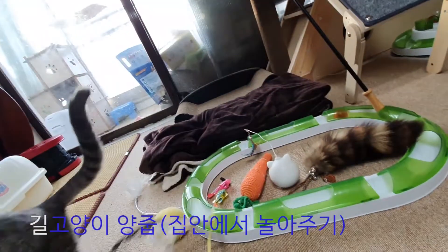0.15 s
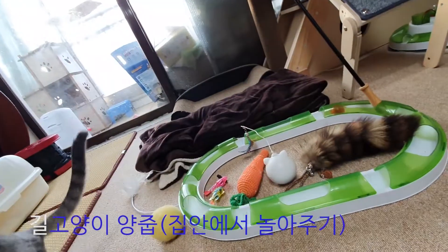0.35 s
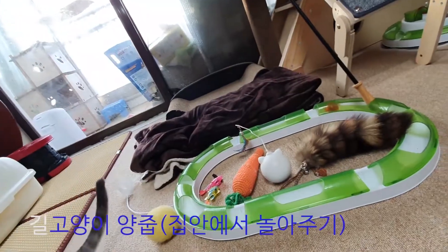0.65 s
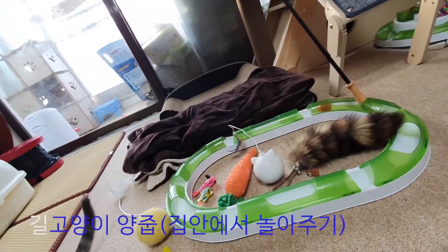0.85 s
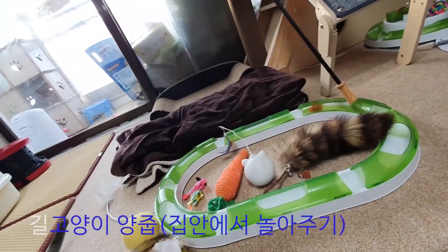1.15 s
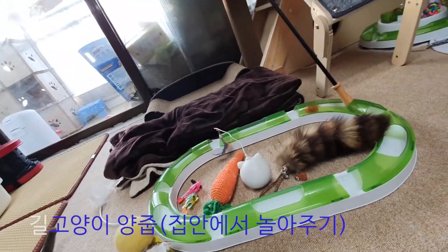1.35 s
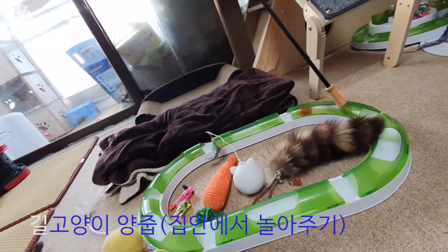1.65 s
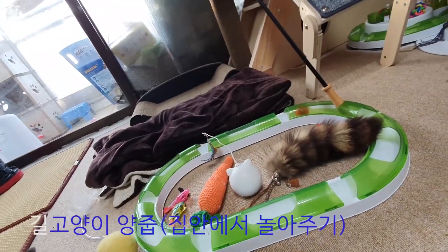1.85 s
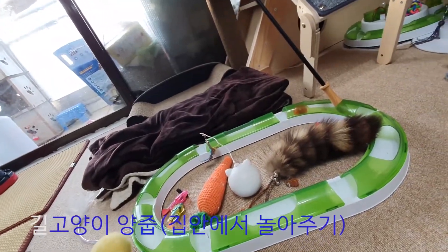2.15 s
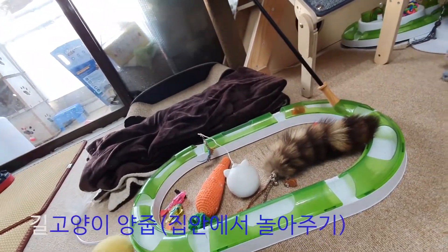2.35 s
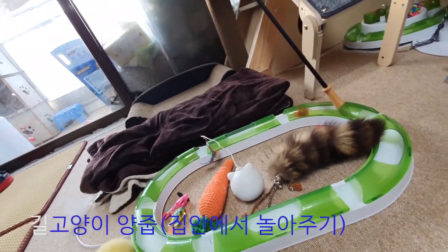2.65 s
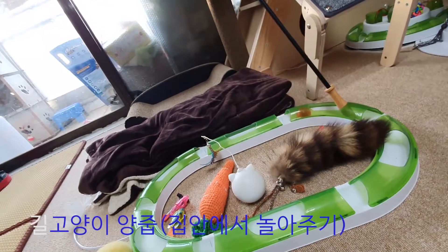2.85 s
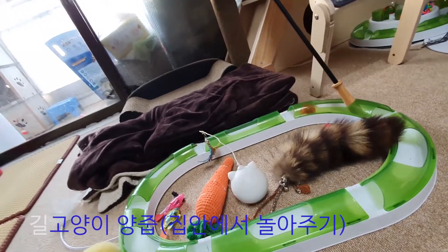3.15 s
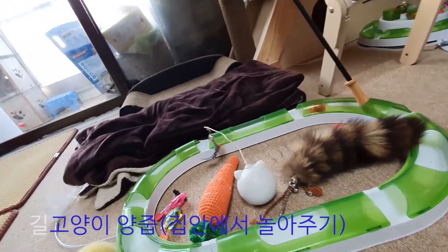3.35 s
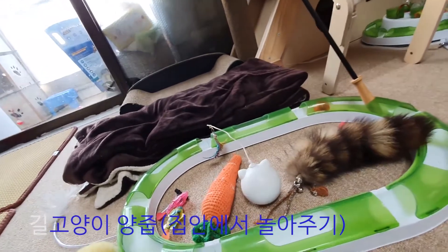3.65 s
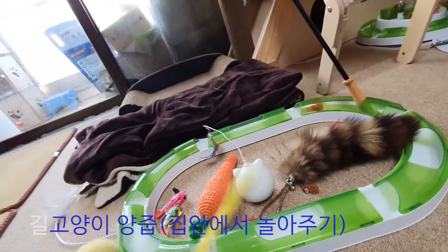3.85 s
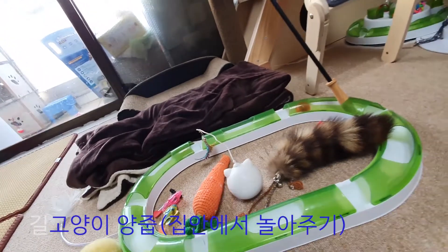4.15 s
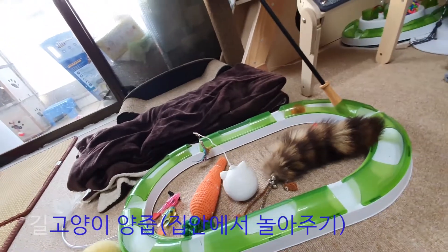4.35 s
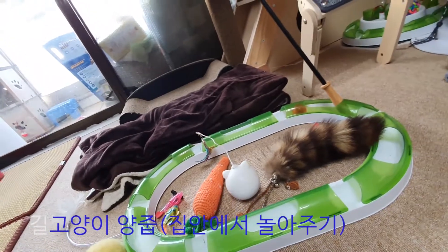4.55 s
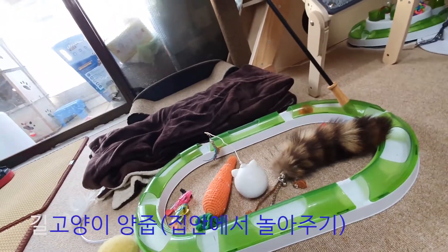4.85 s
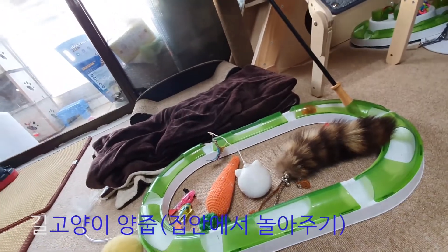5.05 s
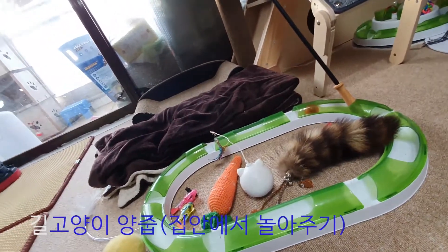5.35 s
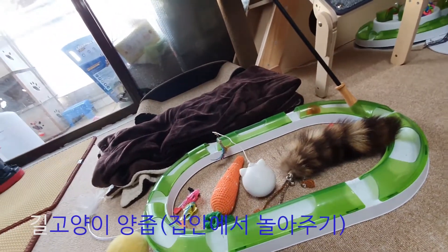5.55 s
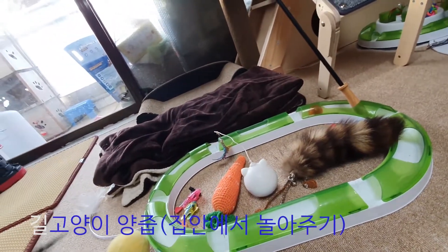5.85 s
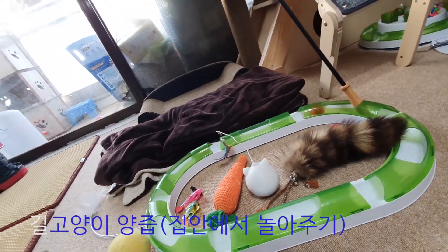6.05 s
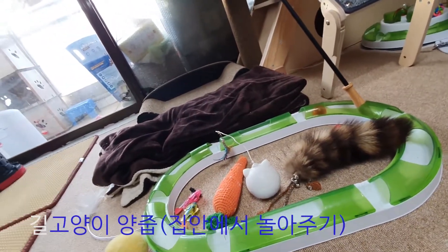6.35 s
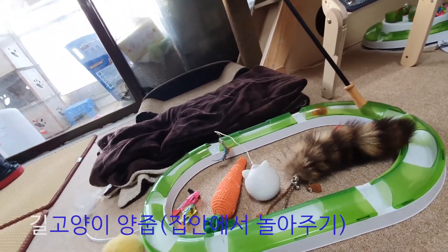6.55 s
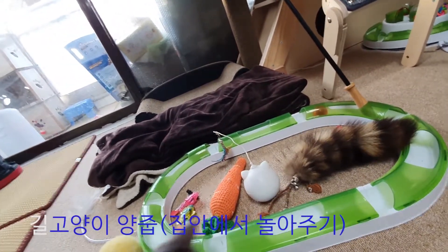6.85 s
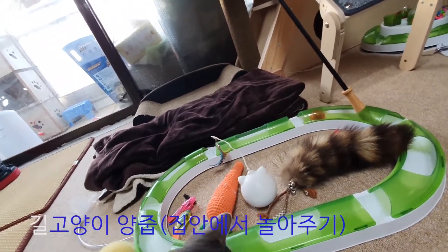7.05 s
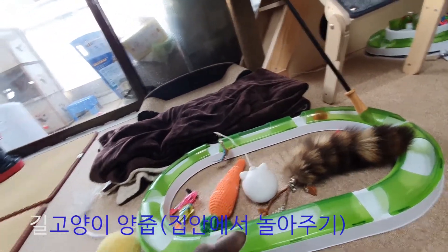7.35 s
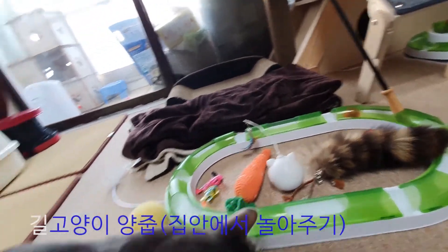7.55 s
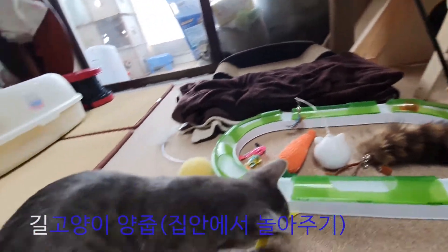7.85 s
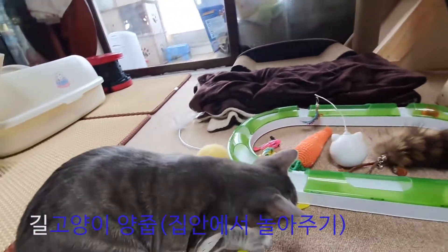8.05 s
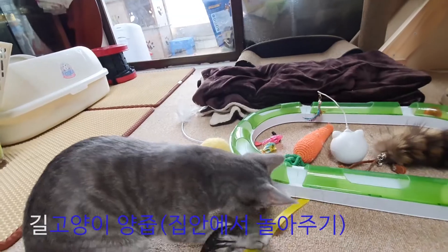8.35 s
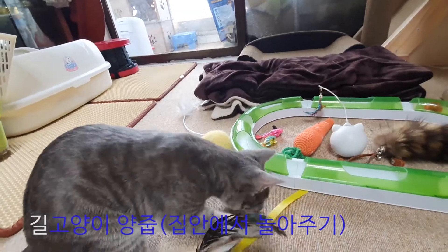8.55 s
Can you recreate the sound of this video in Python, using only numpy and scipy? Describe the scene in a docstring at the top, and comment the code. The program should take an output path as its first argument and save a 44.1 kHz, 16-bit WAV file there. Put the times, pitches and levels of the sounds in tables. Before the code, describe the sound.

A soft, steady appliance hum, a mid-low motor tone over rumbling noise, and faint room air run throughout in a small, fairly dry carpeted room, heard close in stereo. From 0 to 3.7 seconds there are only sparse light taps, at about 0.1, 1.4 and 1.85, and faint scrapes and scuffs. At 3.9 a wand toy's tip snaps hard in a quick double blow, followed by tiny ticks. Quiet soft scraping fades until a short scuff at 5.25; before it, one loud, bright snap lands at 4.9. Light taps cluster from 6.3, then a gritty scuff bursts into a strong snap at 6.63 and another at 6.85. Scrapes thicken from 7.2 as the cat shuffles past, fur and carpet crunching around 7.6 among thuddy taps. A last snap falls at 7.79, then small ticks at 8.2 and hum.

```python
"""A wand toy's light tip snaps down on the floor and a plastic ball track as a cat plays on a carpet.
Snaps and light taps are short blows that ring shared plastic resonances and stir a small room; ticks of
claws and ribbon add no ring of their own. Scuffs, faint to loud, are brief noisy swells through the same
plastic and room. Soft scrape and hiss swell and fade, and the cat's body shuffles by, as friction noise.
An appliance hums throughout, a sine over filtered noise, with the soft noise of the room's air behind it."""
import sys
import numpy as np
from scipy import signal
from scipy.fft import rfft, irfft, next_fast_len
from scipy.io import wavfile
from scipy.ndimage import map_coordinates

SR = 44100
rng = np.random.default_rng(int(sys.argv[2]) if len(sys.argv) > 2 else 0)


def waveform_to_disk(signal):
    """Save audio, clipped to [-1, 1], as 16-bit WAV at the path in sys.argv[1]."""
    frames = np.transpose(np.atleast_2d(signal))
    scaled = np.clip(frames, -1, 1) * 32767
    samples = np.round(scaled).astype(np.int16)
    wavfile.write(sys.argv[1], SR, samples)


N = 383669
SIDES = np.array([[-.5], [.5]])  # left and right microphone port


def amp(db):
    """Decibels to gain."""
    return 10 ** (np.asarray(db) / 20)


def unit(x):
    """Scale to rms 1."""
    return x / np.sqrt(np.mean(x ** 2) + 1e-20)


def along(points, hz):
    """Read a curve of (Hz, value) points on a log frequency axis."""
    f, v = np.transpose(points)
    return np.interp(np.log(hz + 1), np.log(f + 1), v)


def wobble(rate):
    """A smooth random curve with rate knots a second."""
    knots = rng.standard_normal(int(N * rate / SR) + 4)
    return map_coordinates(knots, [np.arange(N) * rate / SR])


def filtered(x, response):
    """Filter x by a complex response of frequency."""
    n = x.shape[-1]
    m = next_fast_len(n + 8192)
    return irfft(rfft(x, m) * response(np.fft.rfftfreq(m, 1 / SR)), m)[..., :n]


def resonance(hz, centre, width):
    """Response of one damped mode, with gain 1 at its centre."""
    return 1j * hz * width / (centre ** 2 - hz ** 2 + 1j * hz * width)


def causal(gain):
    """The minimum-phase response with this magnitude, by folding the cepstrum."""
    cepstrum = irfft(np.log(np.maximum(gain, 1e-6)))
    half = len(cepstrum) // 2
    cepstrum[1:half] *= 2
    cepstrum[half + 1:] = 0
    return np.exp(rfft(cepstrum))


def swell(s, rise, fall):
    """A sound grows until s seconds, then fades: a two-sided bell."""
    t = np.arange(N) / SR - s
    return np.exp(-.5 * (t / np.where(t < 0, rise, fall)) ** 2)


def add(track, sound, s):
    """Mix a sound into the track at s seconds."""
    start = round(s * SR)
    track[:, start:start + sound.shape[1]] += sound[:, :N - start]


# likeness of the two ports for room noise: pitch_hz [Hz], coherence [-1 to 1]
PORT_COHERENCE = [(60, 0.83), (130, 0.97), (210, 0.99), (290, 0.87), (640, 0.06), (1410, -0.57),
                  (3100, -0.2), (8000, -0.044)]


def room_noise(colour):
    """Stereo noise of rms 1: alike in the bass, partly opposed in the midrange, diffuse in the treble."""
    def mid_side(hz):
        turn = np.arccos(np.clip(along(PORT_COHERENCE, hz), -1, 1)) / 2
        return colour(hz) * np.array([np.cos(turn), np.sin(turn)])
    mid, side = filtered(rng.standard_normal((2, N)), mid_side)
    return unit(np.array([mid + side, mid - side]))


# the motor's tone creeps upward: time_s [s], pitch_hz [Hz]
MOTOR_PITCH = [(0, 373.1), (6.5, 373.5), (7.6, 374.3)]
# relative spectrum of the casing's rumble: pitch_hz [Hz], density_db [dB per Hz]
CASING_SPECTRUM = [(20, -27.5), (45, -19.5), (62, -19), (77, -6.5), (97, -16.5), (138, -0.5), (168, -11),
                   (200, -13), (228, -9), (265, -2), (315, -8.5), (350, -1.5), (440, -19.5), (700, -22.5),
                   (1500, -69)]
# thin high resonances of the appliance: pitch_hz [Hz], width_hz [Hz], relative_level_db [dB]
PANEL_MODES = [(538, 11, 3), (770, 27, -1.5), (885, 17.5, -2.5), (1277, 13, -4.5)]


def appliance():
    """A motor sine with slight level drift, over noise through the casing and panel resonances."""
    pitch = np.interp(np.arange(N) / SR, *np.transpose(MOTOR_PITCH))
    phase = 2 * np.pi * np.cumsum(pitch) / SR
    # the room's standing wave reaches the two ports out of step
    tone = np.sqrt(2) * np.sin(phase - 2 * SIDES * .68)
    tone = tone * amp([[-45.4], [-47]]) * amp(.6 * wobble(2))
    # squaring the resonance narrows it
    drone = amp(-51.5) * room_noise(lambda hz: resonance(hz, 199.4, 17.8) ** 2)
    rumble = amp(-51.0) * room_noise(lambda hz: amp(along(CASING_SPECTRUM, hz)))
    panels = amp(-63.5) * room_noise(
        lambda hz: sum(amp(db) * resonance(hz, centre, width) for centre, width, db in PANEL_MODES))
    return tone + (drone + rumble) * amp(SIDES) + panels


# relative spectrum of the room's air: pitch_hz [Hz], density_db [dB per Hz]
AIR_SPECTRUM = [(260, -45.5), (450, -3.5), (607, -12), (726, -4.5), (818, -13.5), (1320, -11.5),
                (1470, -18), (1600, -18.5), (2660, -23), (3640, -32), (5880, -28.5), (8670, -48),
                (16000, -45.5)]


def room_air():
    """Still air: soft, steady stereo noise with a falling treble."""
    return amp(-59.5) * room_noise(lambda hz: amp(along(AIR_SPECTRUM, hz)))


# the room's decay: pitch_hz [Hz], t60_s [s]
ROOM_DECAY = [(300, 0.14), (1300, 0.15), (2500, 0.16), (6000, 0.14), (9000, 0.13), (16000, 0.28)]


def room_tail(size):
    """A fresh diffuse answer of the room, decaying by frequency, mean energy 1 per port."""
    hz, t, z = signal.stft(rng.standard_normal((2, size)), SR, nperseg=256)
    decay = amp(-60 * t / along(ROOM_DECAY, hz)[:, None])
    tail = signal.istft(z * decay, SR, nperseg=256)[1][:, :size]
    # reflections build up over about 4 ms
    tail *= 1 - np.exp(-(np.arange(size) / SR / 0.0039) ** 2)
    return unit(tail) / np.sqrt(size)


# resonances of the plastic, shared by all contacts: pitch_hz [Hz], width_hz [Hz], gain_db [dB]
PLASTIC_MODES = [(1040, 91, 2), (1222, 120, 5.5), (1794, 84, -5.5), (2226, 160, -2), (2470, 93, -7.5),
                 (2960, 210, -3), (3066, 70, -2.5), (3630, 270, -13.5), (4000, 70, 0.5), (5560, 84, -2.5),
                 (6330, 300, -1.5), (7070, 1100, -5.5)]
# spectrum of a contact of middling hardness: pitch_hz [Hz], density_db [dB per Hz]
CONTACT_SPECTRUM = [(100, -22.5), (450, 1.5), (750, 4), (1100, -1), (2000, 4), (3500, 1), (6800, -0.5),
                    (8800, -9.5), (13000, -13.5), (16000, -20.5)]
# thud_db acts below the first frequency; hardness tilts the treble above the second
THUD_HZ, HARD_HZ = 1052, 2770
# a contact's direct level is its rms in this band, taken over BLOW_S for a single blow
BODY_HZ, BLOW_S = (900, 3300), .01
# bending waves in the plastic: low notes arrive later (delay at 1 kHz, s)
BEND_DELAY_S = 0.000689


def sounding(force, thud_db, hardness, rings_hz, room_db, ring_db=0, ring_width_hz=300):
    """A stereo force spectrum rings the plastic, with direct energy 1 in its body band, and stirs the room."""
    size = 2 * (force.shape[1] - 1)
    hz = np.fft.rfftfreq(size, 1 / SR)
    body = 1 + sum(amp(db) * abs(resonance(hz, centre, width)) ** 2 for centre, width, db in PLASTIC_MODES)
    # the point of contact decides which resonances stand out
    body *= 1 + amp(ring_db) * sum(abs(resonance(hz, centre, ring_width_hz)) ** 2 for centre in rings_hz)
    # a heavy contact thuds, a hard one is bright
    thud = thud_db / (1 + (hz / THUD_HZ) ** 16)
    tilt = hardness * np.log2(np.maximum(hz / HARD_HZ, 1))
    bending = np.exp(-4j * np.pi * BEND_DELAY_S * np.sqrt(1000 * hz))
    direct = force * bending * causal(body * amp(along(CONTACT_SPECTRUM, hz) + thud + tilt))
    in_body = (hz > BODY_HZ[0]) & (hz < BODY_HZ[1])
    energy = np.sum(abs(direct[:, in_body]) ** 2) / size
    # the room's answer loses its top
    walls = amp(room_db + along([(500, 7.0), (2000, 6.5), (6000, 6.0), (12000, -3.0)], hz))
    return irfft(direct * (1 + walls * rfft(room_tail(size)))) / np.sqrt(energy)


# a blow's phase lead between ports grows with frequency and levels off above this
LEAD_HZ = 1210


def blow(row, chatter_db, chatter_t60, lead=0, size=16384, **ring):
    """One sharp contact and its brief decaying chatter, with its own time and phase offset between ports."""
    db, thud_db, hardness, *rings_hz, room_db, lag_ms, pan_db = row
    t, hz = np.arange(size) / SR, np.fft.rfftfreq(size, 1 / SR)
    chatter = unit(rng.standard_normal(size) * amp(-60 * t / chatter_t60)) / np.sqrt(size)
    arrival_s = (.2 + SIDES * lag_ms) / 1000
    phase = 2 * np.pi * hz * arrival_s + SIDES * lead * np.tanh(hz / LEAD_HZ)
    force = (1 + amp(chatter_db) * rfft(chatter)) * np.exp(-1j * phase)
    sound = sounding(force, thud_db, hardness, rings_hz, room_db, **ring)[:, :size // 2]
    return amp(db - SIDES * pan_db) * np.sqrt(BLOW_S * SR) * sound


def contacts(table, **touch):
    """Every blow of a table at its moment."""
    track = np.zeros((2, N))
    for s, *row in table:
        add(track, blow(row, **touch), s - .0005)  # early, to offset the travel delay
    return track


# light taps of paws and toy: hit_s [s], level_db [dB], thud_db [dB], hardness [dB per octave],
# ring_hz [Hz], upper_ring_hz [Hz], room_db [dB before the wall curve], right_lag_ms [ms],
# left_minus_right_db [dB]
TAP_HITS = [(.109, -47, 7, 1.5, 1680, 2650, -13.5, 0.093, 6),
            (.499, -61.5, -1, -18, 3000, 3460, -13, 0.33, -11),
            (1.402, -50.5, 3, -3.5, 1720, 6480, -7, 0.114, 2),
            (1.8445, -45.5, 5, -8, 1160, 1870, -14, 0.17, 4), (2.277, -58.5, 9, 4, 2660, 6730, -3, .42, 3),
            (2.431, -62.5, -2, 3.5, 2670, 6930, -13, 0.71, 10),
            (2.9925, -56, 9, -8.5, 1600, 3460, -6, -0.44, -2),
            (3.292, -51.5, 18, -14.5, 1490, 3440, -14, -0.47, -5.5),
            (3.726, -59, -1, 0.5, 1200, 5540, -8, .15, -3),
            (3.747, -49, -9, -14, 1680, 2500, -17, 0.31, -11),
            (5.3125, -58, -3, 2, 3780, 7540, -1.5, 0.21, 6), (5.557, -59, 0, -11, 2460, 2540, -15, 0.37, 7),
            (6.293, -47, -11, 10.5, 1040, 1210, -9, -0.0018, -2),
            (6.3015, -37, 5, -1, 2410, 3080, -14.5, -0.47, -3),
            (6.3485, -46.5, 1, -12, 2350, 2820, -8, -0.02, 7),
            (6.382, -41, -1, -4.5, 1120, 1240, -18, 0.14, 2),
            (6.51, -50, 10, -2, 1090, 2580, -7, 0.086, -1),
            (6.651, -44.5, 6.5, 6.5, 2310, 6000, -7.5, -0.18, -3),
            (7.556, -46, 9.5, -9, 2320, 2770, -2, -0.5, -6),
            (7.575, -47, 10, -5, 2140, 4200, -10, -0.033, -6),
            (7.588, -39, 17.5, -3, 2160, 2900, -17, -.2, 7),
            (7.598, -45, 10, -3.5, 2400, 3070, -9, -0.36, 6),
            (7.6495, -38, -2, -5, 2500, 2730, -14, .06, 4),
            (8.131, -53.5, 5, -21.5, 1820, 2380, -12, -0.17, -3),
            (8.407, -60, 16, -1, 796, 1830, -8, -.36, 3)]


def taps():
    """Paws and toy tap lightly: blows with two strong rings picked out of the plastic."""
    return contacts(TAP_HITS, chatter_db=0.0, chatter_t60=0.013, ring_db=12.0, ring_width_hz=270)


# dry ticks: hit_s [s], level_db [dB], thud_db [dB], hardness [dB per octave],
# room_db [dB before the wall curve], right_lag_ms [ms], left_minus_right_db [dB]
TICK_HITS = [(.219, -68, 1, 4, -2, .14, 0), (.399, -54, -4, -2, -8.5, 0.2, 8.5),
             (3.983, -44, 1, 1.5, -4, .12, 2), (3.9875, -53, -3, 3, -9, .12, 7),
             (3.9912, -39.5, 6, -6.5, -9.5, .1, 2), (4.014, -54, 0, 3, -10, -.36, 1),
             (4.0225, -52.5, -1.5, -2, -14, .14, -1), (4.042, -68, 4, 11.5, -8, .3, 1),
             (4.049, -69, -1, 7, -10, .3, 3), (4.083, -70, -1, 1, -12, .14, 3),
             (4.12, -66, 1.5, 4, -11, .14, 6.5), (7.5297, -40, 2.5, -4, -5, 0.031, 0),
             (7.76, -58, -1, 1.5, -4, 0, 1), (8.1947, -46.5, 4, 0.5, -9, .086, -5),
             (8.2008, -50, 1.5, -5, -2, .086, 0), (8.2072, -48, 6.5, -10.5, -11, -.25, -3.5),
             (8.2098, -50.5, 14, -4.5, -10, -.25, 0.5), (8.2175, -59, 5, -2, -9, .086, -1)]


def ticks():
    """Claws and the toy's ribbon tick: blows with no ring of their own, only the shared plastic."""
    return contacts(TICK_HITS, chatter_db=1.5, chatter_t60=0.017)


def friction(spectrum, rate, grain_share, flutter_db):
    """Friction noise: sparse slips (rate a second) over a fine hiss, with uneven pressure."""
    slips = (rng.random(N) < rate / SR) * rng.standard_normal((2, N))
    hiss = rng.standard_normal((2, N))
    force = np.sqrt(grain_share) * unit(slips) + np.sqrt(1 - grain_share) * hiss
    pressure = amp(flutter_db * wobble(70))
    return unit(filtered(force * pressure, lambda hz: amp(along(spectrum, hz))))


# swells of soft scrape and hiss, some brief, some fading slowly: peak_s [s], rise_s [s], fall_s [s],
# scrape_db [dB before the layer trim], hiss_over_scrape_db [dB before the layer trims]
SCRAPE_SWELLS = [(.29, 0.057, 0.042, -56, -13), (.78, 0.086, 0.13, -66, 0), (1.07, 0.047, 0.068, -79, 11.5),
                 (1.63, 0.029, 0.018, -94.5, 15.5), (2.14, 0.63, 0.13, -63.5, -10.5),
                 (2.52, 0.073, 0.16, -59, -14.5), (2.72, 0.053, 0.047, -56.5, -7.5),
                 (3.6, 0.086, 0.094, -69, 5), (4.03, 0.12, 0.045, -64, -9), (4.3, 0.12, 0.41, -57.5, -7.5),
                 (4.892, 0.024, 0.017, -51.5, -3), (5.8, 0.05, 0.083, -56.5, -9.5),
                 (6.0, 0.014, 0.022, -57, -2.5), (6.3, 0.18, 0.1, -53.5, -8.5),
                 (6.84, 0.067, 0.13, -56.5, -4.5), (7.27, 0.11, 0.1, -51.5, -5.5),
                 (7.47, 0.067, 0.092, -52, -11.5), (7.691, 0.066, 0.11, -47.5, -12),
                 (8.04, 0.053, 0.044, -58.5, -9)]
# relative spectra of the scrape and of the hiss: pitch_hz [Hz], density_db [dB per Hz]
SCRAPE_SPECTRUM = [(410, -45), (700, -18), (766, -2), (950, -1.5), (1130, 1.5), (1610, -3), (2020, -2),
                   (2510, -0.5), (2770, -3), (6000, -17.5), (7800, -62.5), (13200, -120)]
HISS_SPECTRUM = [(2240, -27), (3800, -8), (4230, -7.5), (5820, -4.5), (6810, -1.5), (8560, -17.5),
                 (11400, -15.5), (15000, -20), (16000, -20)]


def scrape_swells():
    """Soft scrape and a brighter hiss swell together as friction noise, some briefly, some fading slowly."""
    scrape_level = sum(amp(db) * swell(*timing) for *timing, db, hiss_db in SCRAPE_SWELLS)
    hiss_level = sum(amp(db + hiss_db) * swell(*timing) for *timing, db, hiss_db in SCRAPE_SWELLS)
    scrape = amp(-1.5) * scrape_level * friction(SCRAPE_SPECTRUM, rate=180, grain_share=0.1, flutter_db=1.5)
    hiss = amp(-1.0) * hiss_level * friction(HISS_SPECTRUM, rate=210, grain_share=0.17, flutter_db=1.7)
    return scrape + hiss


# short scuffs, faint to loud, some just before a snap: middle_s [s], spread_s [s], level_db [dB],
# thud_db [dB], hardness [dB per octave], ring_hz [Hz]
SCUFF_SWELLS = [(0.392, 0.007, -54.5, 0, 3.5, 2600), (0.406, 0.0048, -55, -2, 0.5, 3580),
                (1.389, .015, -50, 3, 2, 1560), (1.865, 0.02, -49.5, 8, -3.5, 1310),
                (2.124, 0.0044, -51, 9, -27, 1370), (2.681, .03, -59, 0, -6, 3070),
                (3.753, 0.0034, -44.5, -18, -7.5, 2580), (3.775, 0.0067, -48.5, -13, 0, 2360),
                (4.284, .005, -57.5, 1, 4.5, 4650), (5.244, 0.0034, -40, 2, -14, 1360),
                (5.268, .014, -43.5, -6, -6.5, 1550), (5.297, .011, -46, 0, 2, 2620),
                (5.566, 0.0073, -49.5, -8, -4.5, 2480), (6.286, .009, -62, 0, 7, 6570),
                (6.363, .004, -42, 2, -4, 2460), (6.499, 0.004, -42, -1, -6, 2430),
                (6.613, 0.0023, -29, -10.5, -7, 2350), (6.625, 0.0035, -20.5, -18.5, -1.5, 2290),
                (6.846, .002, -32, -16, 2, 1990), (6.979, 0.008, -51, -9, -21, 2020),
                (7.037, 0.0087, -52.5, 6.5, 6.5, 1910), (7.065, .006, -42, 8, 0, 1980),
                (7.18, 0.0082, -46.5, -8, -32, 2080), (7.359, 0.01, -44, -1, -11, 1990),
                (7.445, .008, -48, -3, -15, 2700), (7.508, 0.0089, -43.5, 6, -20, 2580),
                (7.564, 0.017, -43, 6, -9.5, 2150), (7.597, .0074, -35.5, 13, 0.5, 2800),
                (8.188, .0035, -54, 3, -1, 6000)]


def scuffs(size=16384):
    """Brief noisy swells, faint to loud, some just before a snap: tiny uneven slips ring the plastic."""
    track, t = np.zeros((2, N)), np.arange(size) / SR
    for s, spread, db, thud_db, hardness, ring_hz in SCUFF_SWELLS:
        slips = rng.standard_normal((2, size)) * amp(5.2 * rng.standard_normal(size))
        pressure = np.exp(-.5 * (t / spread - 3) ** 2)  # peaks three spreads in
        scuff = sounding(rfft(slips * pressure), thud_db, hardness, [ring_hz],
                         room_db=-10.0, ring_db=12, ring_width_hz=330)
        add(track, amp(db) * np.sqrt(spread * SR) * scuff, s - 3 * spread)
    return track


# hard snaps of the tip: hit_s [s], level_db [dB], thud_db [dB], hardness [dB per octave],
# ring_hz [Hz], upper_ring_hz [Hz], room_db [dB before the wall curve], right_lag_ms [ms],
# left_minus_right_db [dB], left_phase_lead [rad]
TIP_HITS = [(3.8874, -23, -10.5, 0, 1262, 1760, -10, -0.0092, 0.5, 2.1),
            (3.8929, -27.5, -3.5, 2, 1000, 1788, -11, 0, -1, -2.2),
            (4.9012, -17.5, -23, -5.5, 1350, 3110, -11, -0.027, 1.5, 2.5),
            (6.6256, -27.5, -1, 0, 2180, 2940, -17, 0.02, 7, 2.5),
            (6.6296, -23, -6, 1, 884, 1240, -13, 0.059, 3, 1),
            (6.85, -18.5, -15.5, -3.5, 1900, 2150, -8, -0.0022, 0, 1.82),
            (7.7859, -27.5, -21, -6, 2410, 2870, -15, 0.012, 4, 0.76),
            (7.7876, -32, -2.5, 1.5, 1010, 1070, -15.5, 0.0053, -3, -1.5)]


def tip_snaps():
    """The tip snaps down hard: sharp blows, each with its own phase lead between the ports."""
    track = np.zeros((2, N))
    for s, *row, lead in TIP_HITS:
        snap = blow(row, chatter_db=3.5, chatter_t60=0.0099, lead=lead, ring_db=4.5, ring_width_hz=160)
        add(track, snap, s - .0005)  # early, to offset the travel delay
    return track


# the cat's body shuffles past: fastest_s [s], rise_s [s], fall_s [s], level_db [dB before the layer trims]
BODY_SHUFFLES = [(7.4, 0.21, 0.51, -60.5), (7.595, 0.04, 0.013, -42.5)]
# relative spectra of the crunching carpet pile and of the fur: pitch_hz [Hz], density_db [dB per Hz]
PILE_SPECTRUM = [(500, -29), (1200, -12), (2000, -4), (2700, 3), (3600, -14), (6500, -6), (9000, -25),
                 (16000, -33.5)]
FUR_SPECTRUM = [(25, 0), (80, 5.5), (300, -2), (700, -13.5), (1500, -3), (2600, -6.5), (4500, -5.5),
                (8000, -23.5), (16000, -27)]


def body_shuffles():
    """The cat's body brushes by: soft fur friction, and coarse pile crunching in separate grains."""
    brush = sum(amp(db) * swell(*timing) for *timing, db in BODY_SHUFFLES)
    crunch = amp(-3.5) * friction(PILE_SPECTRUM, rate=180, grain_share=0.75, flutter_db=0.5)
    fur = amp(1.5) * friction(FUR_SPECTRUM, rate=260, grain_share=0.14, flutter_db=4.5)
    return brush * (crunch + fur)


def scene():
    """Snaps, taps, ticks, scuffs and rustles over the hum and the still air of the room."""
    background = appliance() + room_air()
    play = taps() + ticks() + scrape_swells() + scuffs() + tip_snaps() + body_shuffles()
    return background + play


# the two ports hear a little differently: pitch_hz [Hz], left_minus_right_db [dB]
PORT_COLOUR = [(500, 0), (1200, -2), (2500, -4.5), (5000, -3.5), (9000, 2), (15000, 2.5)]
TOP_HZ = 16300  # band limit


def record(dry):
    """Each port adds its colour; peaks clip at full scale, then nothing above the band limit is kept."""
    heard = filtered(dry, lambda hz: amp(along(PORT_COLOUR, hz) * -SIDES))
    return filtered(np.clip(heard, -1, 1), lambda hz: hz < TOP_HZ)


dry = scene()
out = record(dry)
waveform_to_disk(out)
```